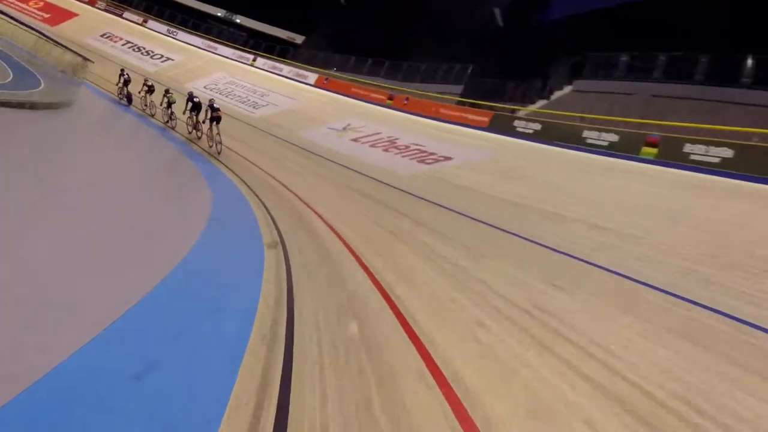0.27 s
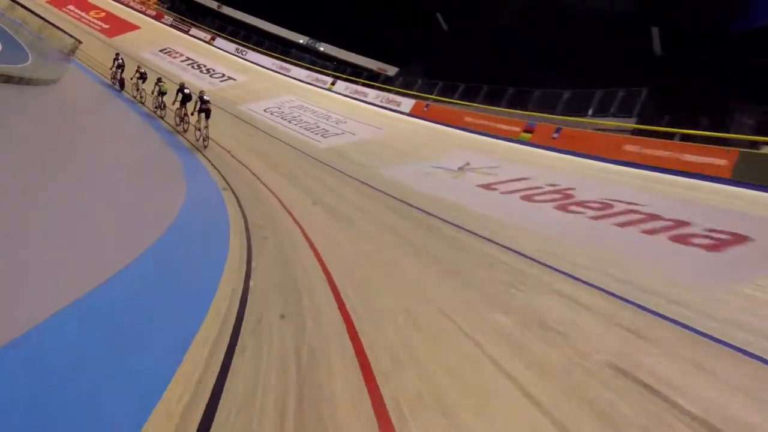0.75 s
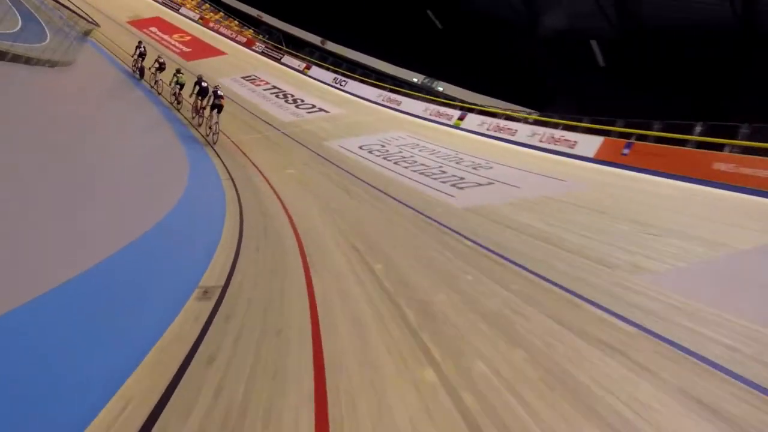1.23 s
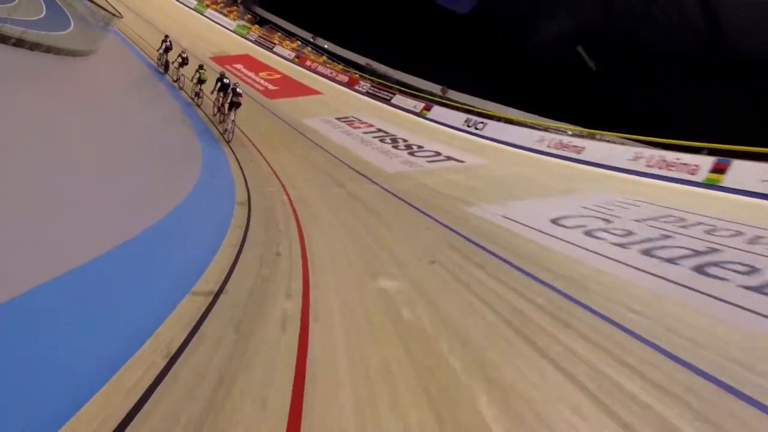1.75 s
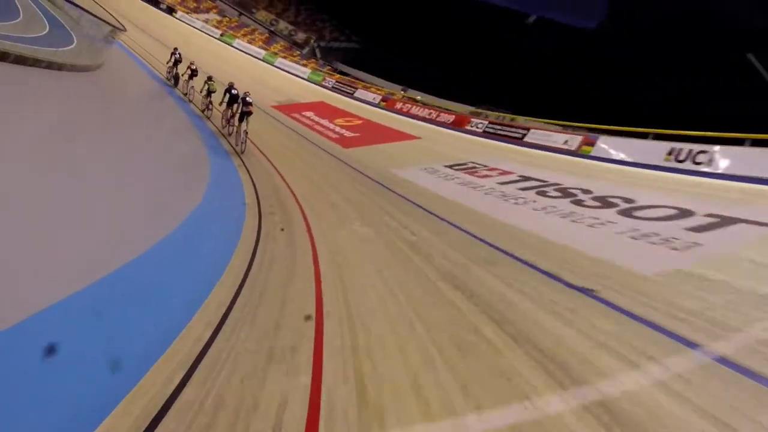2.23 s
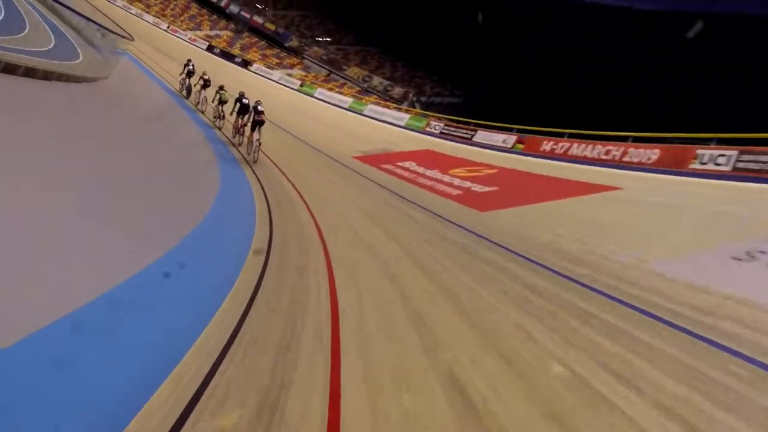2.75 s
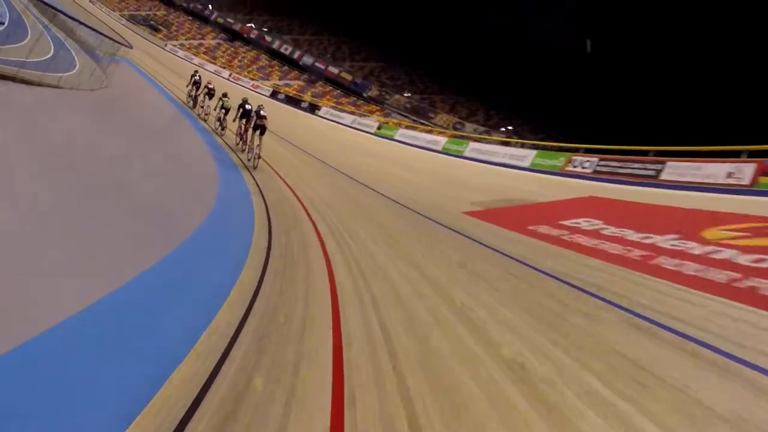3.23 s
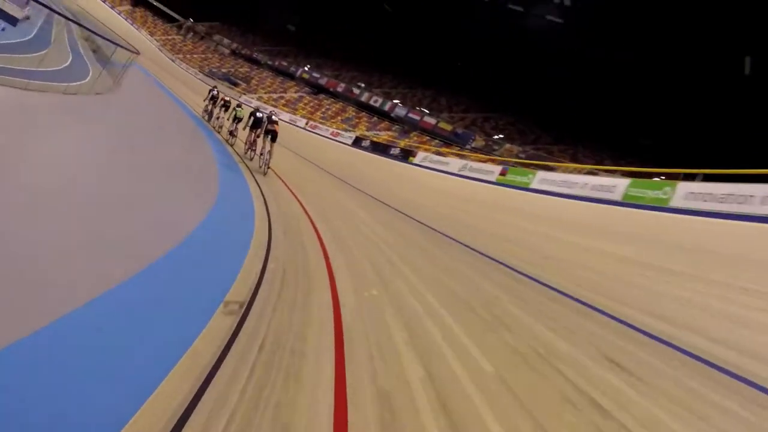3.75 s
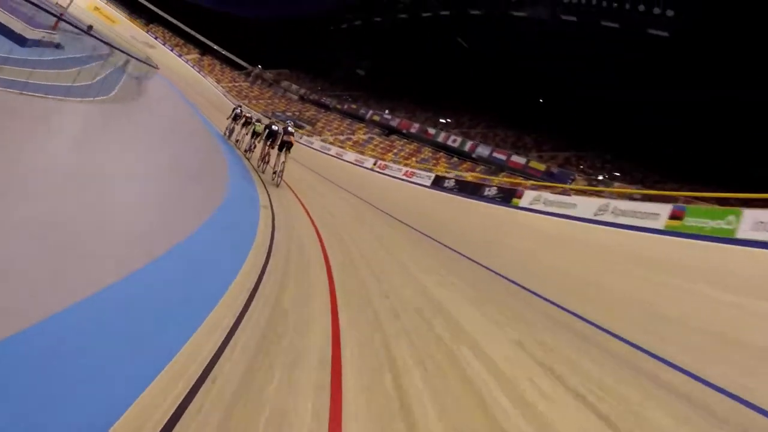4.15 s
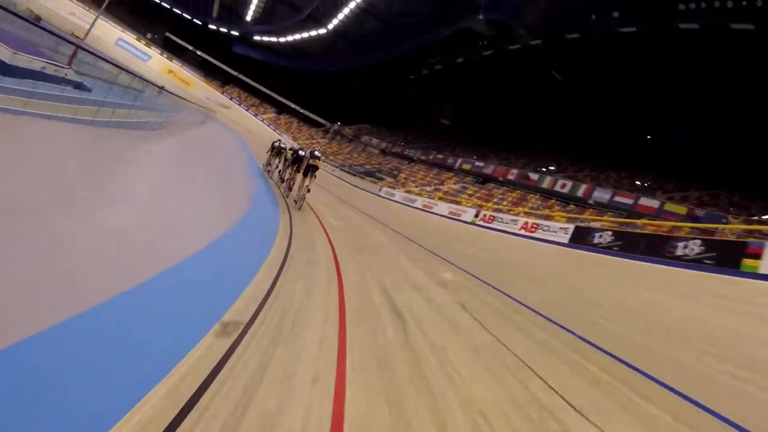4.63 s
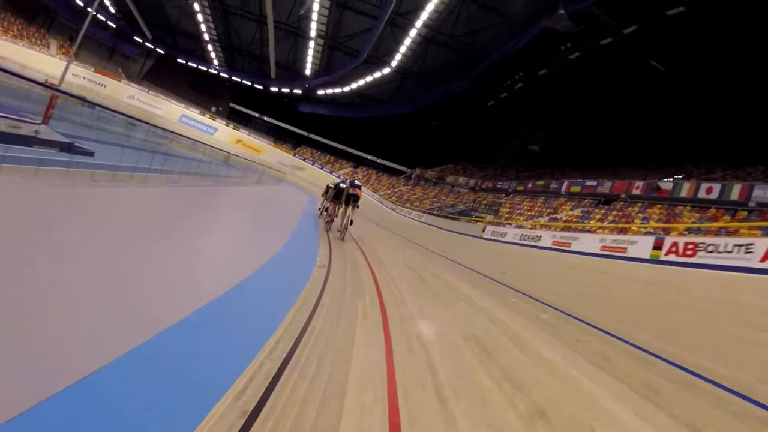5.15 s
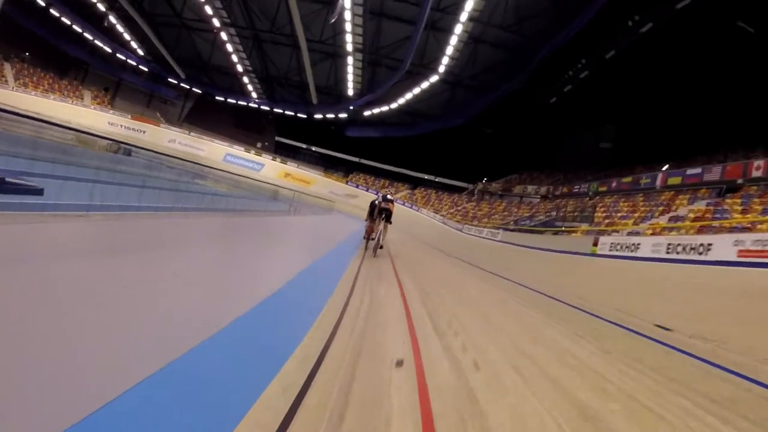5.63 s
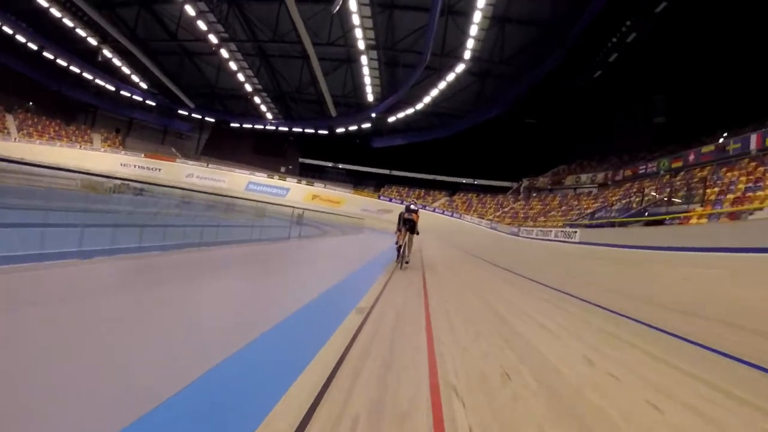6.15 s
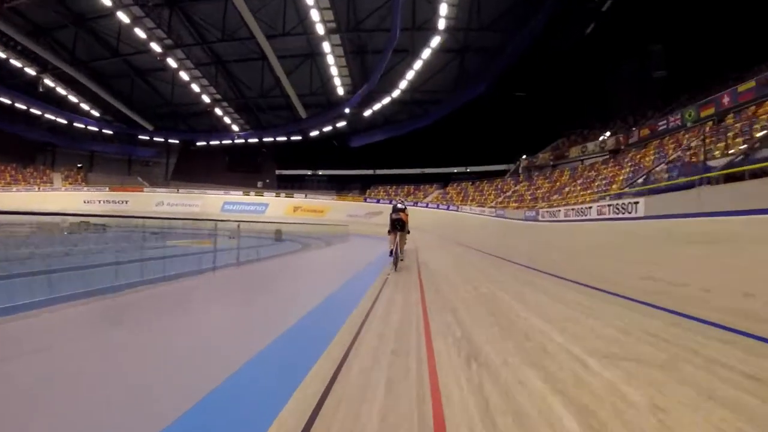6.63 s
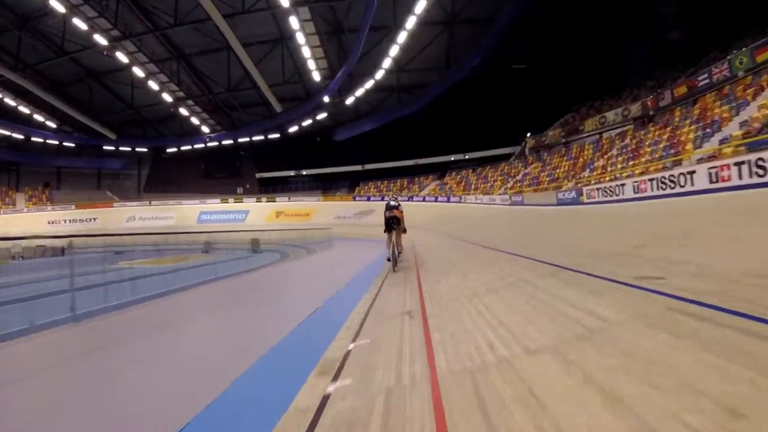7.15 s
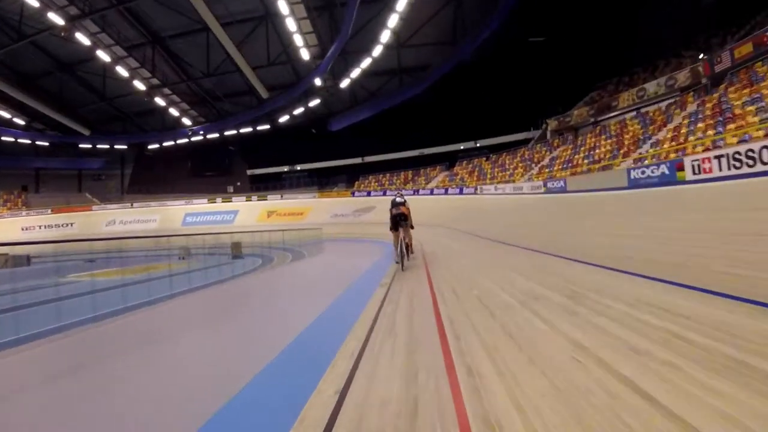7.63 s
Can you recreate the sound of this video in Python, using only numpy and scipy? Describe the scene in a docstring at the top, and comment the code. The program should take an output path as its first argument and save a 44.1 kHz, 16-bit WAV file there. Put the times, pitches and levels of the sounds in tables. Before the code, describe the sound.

From start to finish, deep wind pounds the microphone of a camera on a fast bicycle circling an indoor wooden track. The buffeting is a heavy, irregular low throb, with split-second lulls, notably near 0.4 s, frequently from 2 to 4.8 s, and at 5.7 and 7.9 s. Under it the tyres keep up a steady, grainy mid-low roar, with a hollow board drone swelling around 0.9, 3.3 and 6 s and a wavering frame hum strongest near 7.5 s. Dull, hard-edged knocks come sparsely at first, then stand out at 3.3, 4.4, a cluster at 5.1-5.2, 5.5, 6.5, 6.8 and 7.4 s. Brief ragged gusts flap, especially around 5.2-5.6 and 6.5 s. A faint, bright mount chatter, slightly pulsed by the chain, continues throughout with scattered sharp ticks. Everything is close, dense and peak-limited, with no noticeable room echo.

```python
"""Wind buffets the microphone of a camera riding on a fast track bicycle in an indoor velodrome.
Buffets are low coloured noise plus a vortex throb; flapping and rush are jolted noise.
Tyres on the wooden boards are noise through roar and resonance filters; uneven boards are dying bursts.
The camera mount chatters in random ticks, weakly pulsed by the chain, with a few sharp rattles.
A limiter in the camera holds the loudest peaks down."""
import sys
import numpy as np
from scipy import signal
from scipy.fft import rfft, irfft, next_fast_len
from scipy.io import wavfile
from scipy.ndimage import uniform_filter1d, minimum_filter1d, map_coordinates

SR = 44100
rng = np.random.default_rng(int(sys.argv[2]) if len(sys.argv) > 2 else 0)


def wrap_up_sound(samples):
    """Save the sound to the file named by the first command line argument, as 16-bit audio."""
    columns = np.atleast_2d(samples).T
    # keep every value between -1 and 1, then stretch to whole-number steps
    tamed = np.clip(columns, -1, 1)
    steps = np.round(tamed * 32767).astype(np.int16)
    wavfile.write(sys.argv[1], SR, steps)


N = 347949

# Spectrum of the big eddies. Each row: frequency in Hz, relative level in dB.
BUFFET_SPECTRUM = [(8, -12), (20, -7.5), (30, -4.5), (45, -5.5), (59, -3.5), (69, -7.5), (82, -11),
                   (93, -11), (110, -16), (180, -32), (300, -42.5), (800, -53), (4000, -110)]
# Spectrum of loose eddies under the buffets. Each row: frequency in Hz, relative level in dB.
RUMBLE_SPECTRUM = [(10, -8.5), (22, 2), (31, 3.5), (48, -7.5), (75, -2.5), (93, 0.5), (115, -3), (140, -11),
                   (180, -24), (400, -50.5), (2000, -100)]
# Strength of the headwind. Each row: time in seconds, level in dB before swings and lulls.
HEADWIND_LEVEL = [(0.1, -8.5), (1.3, -11.5), (2.8, -9), (4.2, -10), (5.7, -8.5), (6.7, -10.5), (7.8, -10)]
# Brief drops of the buffeting. Each row: centre in seconds, depth in dB (negative swells).
LULLS = [(0.36, 13), (0.525, 6), (0.885, 4), (2.05, 3), (2.25, 4.5), (2.37, 0), (2.585, 6), (2.905, 6),
         (3.08, 3), (3.245, 5), (3.45, 7.5), (3.615, 2), (3.775, 8), (3.95, 2.5), (4.13, 9), (4.31, 8),
         (4.48, 11), (4.81, 9), (5.72, 10), (5.82, 4), (6.285, 6), (6.44, 5), (6.99, 4), (7.605, -4),
         (7.87, 12)]
LULL_S = 0.027  # Gaussian half-width, to 1/e
WIND_SWING_DB, WIND_SWINGS_PER_S = 1.4, 20
WIND_CEILING_DB, RUMBLE_DB, SHEDDING_DB = -6, -22, -3  # shedding is relative to the big eddies


def wind(steadiness):
    """Big eddies, evened in strength, beat on the microphone over a loose deep rumble; small puffs flap."""
    big_eddies = unit(coloured(noise(), BUFFET_SPECTRUM))
    eddies = unit(big_eddies + amp(SHEDDING_DB) * vortices())
    power = np.abs(signal.hilbert(eddies, next_fast_len(N))[:N]) ** 2
    slow_power = filtered(power, lambda hz: np.exp(-(hz / 22) ** 2))
    strength = np.sqrt(np.abs(slow_power) + 0.039)  # the floor keeps weak eddies weak
    t = np.arange(N) / SR
    lull_db = sum(depth * np.exp(-((t - s) / LULL_S) ** 2) for s, depth in LULLS)
    level_db = curve(HEADWIND_LEVEL) + WIND_SWING_DB * wobble(WIND_SWINGS_PER_S) - lull_db
    evened = unit(eddies / strength ** steadiness)
    buffets = limited(amp(level_db) * evened, WIND_CEILING_DB)
    rumble = amp(RUMBLE_DB) * unit(coloured(noise(), RUMBLE_SPECTRUM))
    return buffets + rumble + flapping(puff_db=3.5, ragged_db=4.0)


# Shedding by the camera body, faster when the air meets it head on.
# Each row: time in seconds, vortices per second.
SHEDDING_RATE = [(0.15, 54.3), (0.5, 54), (0.85, 60), (1.3, 61.5), (1.9, 50), (2.4, 43.6), (2.6, 44.4),
                 (2.85, 41.7), (3.15, 45.3), (3.75, 38.7), (4.3, 50), (4.6, 42.7), (4.9, 51), (5.2, 47),
                 (5.65, 55), (6.2, 54.4), (7.05, 41.8), (7.65, 53)]
SHEDDING_CHANGES_PER_S = 18


def vortices():
    """A rough, narrow throb at the shedding rate, its strength and phase drifting at random."""
    phase = 2 * np.pi * np.cumsum(curve(SHEDDING_RATE)) / SR
    in_phase = wobble(SHEDDING_CHANGES_PER_S) * np.cos(phase)
    quadrature = wobble(SHEDDING_CHANGES_PER_S) * np.sin(phase)
    return unit(in_phase + quadrature)


# Spells of rougher air.
# Each row: start in seconds, length in seconds, low flapping in dB, brighter rush in dB.
GUSTS = [(0, 1.6, -28.5, -35.5), (0.384, 0.045, -23.5, -35), (0.702, 0.05, -26, -38),
         (2, 0.058, -22.5, -28), (2.463, 0.048, -24.5, -30), (3.34, 0.039, -25, -25.5),
         (4.05, 0.046, -33, -29), (4.664, 0.09, -35, -31.5), (5.151, 0.061, -20, -26),
         (5.498, 0.03, -17, -26), (5.559, 0.049, -20.5, -26), (6.032, 0.033, -25.5, -27),
         (6.261, 0.054, -27, -31), (6.501, 0.063, -17, -35.5), (7.157, 0.23, -27, -39),
         (7.436, 0.036, -19.5, -32), (7.533, 0.027, -25.5, -31), (7.74, 0.023, -33, -22)]
# Spectrum of the flapping puffs. Each row: frequency in Hz, relative level in dB.
PUFF_SPECTRUM = [(80, -18), (130, -1), (190, -3), (280, -3.5), (380, -13), (1000, -35), (4000, -79)]
# Spectrum of a gust's rush. Each row: frequency in Hz, relative level in dB.
RUSH_SPECTRUM = [(150, -9.5), (400, 1.5), (850, 0), (1200, -10.5), (1800, -20), (2800, -32.5),
                 (5000, -43.5), (10000, -71)]
GUST_ATTACK_S, GUST_RELEASE_S = 0.03, 0.013
FLAP_DB, FLAP_DB_PER_SHAKE_DB = -32, 0.49  # flapping in smooth air


def flapping(puff_db, ragged_db):
    """Low puffs of air never cease; each gust strengthens them and adds a ragged rush."""
    t = np.arange(N) / SR
    low, bright = np.zeros(N), np.zeros(N)
    for s, length, low_db, rush_db in GUSTS:
        attack = np.clip((t - s) / GUST_ATTACK_S, 0, 1)
        release = np.exp(-np.maximum(t - s - length, 0) / GUST_RELEASE_S)
        low += amp(low_db) * attack * release
        bright += amp(rush_db) * attack * release
    smooth_air = amp(FLAP_DB + FLAP_DB_PER_SHAKE_DB * shaking())
    strength = np.hypot(smooth_air, low)
    puff_jolts = jolts(per_s=120, decay_s=0.0072)
    puffs = unit(coloured(noise() * amp(puff_db * puff_jolts), PUFF_SPECTRUM))
    rush_jolts = jolts(per_s=110, decay_s=0.0026)
    rush = unit(coloured(noise() * amp(ragged_db * rush_jolts), RUSH_SPECTRUM))
    return strength * puffs + bright * rush


# How hard the track shakes the bicycle. Each row: time in seconds, relative tyre level in dB.
TRACK_LEVEL = [(0.05, -27), (1.6, -26.5), (1.82, -27.5), (2.0, -26), (3.15, -27.5), (3.38, -27),
               (3.92, -31), (4.18, -26), (4.55, -27.5), (4.75, -26), (4.95, -30), (5.18, -27.5),
               (5.38, -28), (5.55, -25), (5.68, -29.5), (6.15, -26.5), (6.8, -26.5), (7.2, -26.5),
               (7.6, -27)]
# Spectrum of the tyre roar. Each row: frequency in Hz, relative level in dB.
ROAR_SPECTRUM = [(60, -15), (110, -1), (190, -3.5), (310, -0.5), (450, 0), (560, -4.5), (730, -9.5),
                 (1000, -11.5), (1250, -20.5), (1800, -27), (2500, -36), (4000, -51.5), (9000, -75)]
# Frame resonances. Each row: frequency in Hz, width in Hz, relative gain in dB.
FRAME_MODES = [(548.4, 30, -4), (639.6, 23, -4.5), (826, 46, -12), (1946, 42, -26.5), (2115, 26, -25)]
# The frame's two lowest resonances. Each row: frequency in Hz, width in Hz, relative gain in dB.
FRAME_HUM_MODES = [(367, 20, 0.5), (456, 32, -7.5)]
# Frame hum as the rider loads it. Each row: time in seconds, level in dB.
HUM_LEVEL = [(0.1, -26.5), (0.6, -36.5), (1.3, -29), (1.75, -31), (2.5, -31), (3.0, -32.5), (3.45, -31.5),
             (3.9, -31), (4.4, -30), (4.85, -32), (5.28, -27.5), (5.8, -33.5), (6.5, -28.5), (7.1, -35),
             (7.53, -24), (7.85, -31)]
# Resonance of the hollow boards. Each row: frequency in Hz, width in Hz, relative gain in dB.
BOARD_MODES = [(144.3, 17, 0)]
# Drone of the hollow boards. Each row: time in seconds, relative level in dB.
DRONE_LEVEL = [(0.05, -22.5), (0.85, -17.5), (1.1, -25.5), (1.7, -24.5), (2.48, -21), (2.8, -28),
               (3.2, -28), (3.34, -18.5), (3.5, -27.5), (4.05, -29.5), (4.65, -22.5), (5.1, -24),
               (5.7, -29.5), (6.0, -18.5), (6.28, -25), (6.6, -22.0), (7.3, -20.5), (7.85, -29.5)]
CHURN_DB = 1.3  # depth of the roar's swelling patches
HUM_WANDER, DRONE_WANDER = 0.01998, 0.01797  # pitch drift as a share


def tyres(jolt, roar_db, rough_db, frame_db, drone_db):
    """Track grain drives a broad roar and the frame; steady noise rings the hum and hollow boards."""
    tread = patchy(noise() * amp(rough_db * jolt), depth_db=1.66, size=3)
    roar = unit(coloured(patchy(tread, CHURN_DB, size=4, order=1024), ROAR_SPECTRUM))

    frame = ringing(noise() * amp(rough_db * jolt), FRAME_MODES)
    frame = unit(coloured(frame, [(150, -23.0), (350, 7.5), (2200, 4.5), (2600, -29.5), (9000, -59.5)]))

    drone_drive = coloured(noise(), [(60, -22.0), (145, -3.5), (220, -12.5), (1000, -56.5)])
    drone = unit(ringing(drone_drive, BOARD_MODES))
    drone = amp(curve(DRONE_LEVEL) + drone_db) * wandering(drone, DRONE_WANDER, rate=4)

    hum_drive = coloured(noise(), [(150, -25.5), (350, 0), (500, -0.5), (1500, -24), (9000, -68.5)])
    hum = unit(ringing(hum_drive, FRAME_HUM_MODES))
    hum = amp(curve(HUM_LEVEL)) * wandering(hum, HUM_WANDER, rate=5)

    rolling = unit(roar + amp(frame_db) * frame)
    return amp(curve(TRACK_LEVEL) + roar_db) * rolling + hum + drone


def shaking():
    """Track shaking in dB about its mean, from the tyre level."""
    level_db = curve(TRACK_LEVEL)
    return level_db - level_db.mean()


# Uneven boards under the wheels.
# Each row: start in seconds, thump peak in dB, hard edge peak in dB, crack peak in dB.
BUMPS = [(0.313, -21, -22.5, -35), (0.892, -14, -18.5, -36.5), (1.556, -11.5, -25, -35),
         (2.031, -14, -21, -40), (2.091, -22, -26, -32.5), (2.367, -13.5, -22, -39), (2.490, -13, -21, -39),
         (2.4991, -12, -18, -26), (2.675, -16.5, -18, -37), (3.105, -30, -18, -33),
         (3.3201, -10, -12.5, -29), (3.329, -17, -18, -38), (3.558, -22, -24, -31),
         (3.615, -15, -30.5, -40), (3.732, -16, -18, -32), (4.352, -22, -25, -35), (4.366, -10, -13, -25.5),
         (4.600, -23, -20, -34.5), (4.802, -22, -18, -39), (4.820, -18, -23, -42),
         (5.124, -12.5, -22.5, -38.5), (5.1407, -30, -18.5, -32.5), (5.164, -14.5, -17.5, -35),
         (5.173, -16, -19.5, -27), (5.184, -19, -18, -37), (5.508, -12, -13.5, -34), (5.524, -8, -13, -34),
         (5.604, -16, -24, -32), (5.791, -21, -17, -40), (5.819, -20, -28, -42), (6.356, -14, -21.5, -40),
         (6.364, -21, -21, -40), (6.521, -8.5, -19, -35), (6.799, -9, -19.5, -33), (6.996, -12, -23, -39),
         (7.264, -23, -24, -38), (7.411, -9, -20, -38), (7.523, -18, -25, -31), (7.594, -12.5, -20, -33),
         (7.726, -15.5, -17, -41), (7.744, -17, -19.5, -31)]
# Spectrum of a thump. Each row: frequency in Hz, relative level in dB.
THUMP_SPECTRUM = [(60, -5), (140, 12.5), (250, 15.5), (500, 6), (900, -10), (1400, -24.5), (3000, -60),
                  (8000, -73.5)]
# Spectrum of a hard edge. Each row: frequency in Hz, relative level in dB.
EDGE_SPECTRUM = [(250, -8), (500, 17.5), (900, 17), (1400, -1.5), (2200, -14), (3200, -25), (5000, -32),
                 (9000, -55.5)]
# Spectrum of a crack. Each row: frequency in Hz, relative level in dB.
CRACK_SPECTRUM = [(600, -14), (1100, 0), (1600, -1), (2500, -8), (3800, -15), (4600, -32), (9000, -60)]


def bumps():
    """An uneven board gives a dull thump, a short hard edge and a crack, each with its own level."""
    s, body, edge, crack = np.transpose(BUMPS)
    thumps = bursts(zip(s, body), t60=0.066, spectrum=THUMP_SPECTRUM, attack_s=0.0016)
    edges = bursts(zip(s, edge), t60=0.026, spectrum=EDGE_SPECTRUM, attack_s=0.0007)
    cracks = bursts(zip(s, crack), t60=0.014, spectrum=CRACK_SPECTRUM, attack_s=0.0004)
    return thumps + edges + cracks


# Mount chatter. Each row: time in seconds, relative level in dB.
CHATTER_LEVEL = [(0.05, -53), (0.57, -53), (0.7, -54), (1.37, -52.5), (1.5, -54.5), (2.0, -53), (2.2, -53),
                 (2.4, -53), (3.1, -53), (3.6, -55), (3.8, -57.5), (4.3, -54), (4.65, -54), (4.85, -56),
                 (5.35, -53.5), (5.8, -54.5), (6.6, -53.5), (7.1, -53.5), (7.85, -54.5)]
# Spectrum of the contacts. Each row: frequency in Hz, relative level in dB.
CHATTER_SPECTRUM = [(800, -16), (1800, -0.5), (2900, 2.5), (4200, -2), (5000, 0), (6300, -3.5),
                    (7000, -7.5), (9200, -9.5), (10200, -18), (11000, -19.5), (11400, -30), (15000, -46.5)]
# Mount and housing resonances. Each row: frequency in Hz, width in Hz, relative gain in dB.
MOUNT_MODES = [(3000, 60, -7), (3280, 45, 1.5), (3610, 60, 0), (3725, 60, 4), (4218, 50, -3),
               (4950, 90, -4), (5130, 150, -9), (5630, 65, -2), (6170, 50, -7), (6420, 60, -7),
               (7394, 24, 5.5), (8897, 45, 1)]


def mount(jolt, chatter_db, swing_db, shake_db, flutter_db, chain_db, ticks_per_s, hiss_db, ring_db,
          rattle_db):
    """Clusters of tiny contacts, pulsing with the chain, and a few hard ones ring mount and housing."""
    ticks = (rng.random(N) < ticks_per_s / SR) * noise()
    flutter = jolts(per_s=38, decay_s=0.0056)
    clusters = amp(shake_db * jolt + flutter_db * flutter + chain_db * chain())
    ticks_and_hiss = unit(ticks) + amp(hiss_db) * noise()
    contacts = unit(coloured(ticks_and_hiss * clusters, CHATTER_SPECTRUM))
    level_db = curve(CHATTER_LEVEL) + chatter_db + swing_db * wobble(21)
    # the contact point wanders, so the colour keeps changing
    chatter = patchy(amp(level_db) * contacts, depth_db=1.68, size=14)
    struck = chatter + amp(rattle_db) * rattles()
    return struck + amp(ring_db) * ringing(struck, MOUNT_MODES)


# Links meshing with the chainring. Each row: time in seconds, links per second.
CHAIN_RATE = [(0.2, 98.2), (2.2, 94.5), (4.3, 93.5), (5.5, 100), (7.85, 90)]


def chain():
    """The tug of the links on the chainring, one cycle a link, slightly unsteady."""
    return np.cos(2 * np.pi * np.cumsum(curve(CHAIN_RATE)) / SR + 0.9 * wobble(4))


# Sharp rattles of the mount. Each row: start in seconds, relative peak in dB, pitch in Hz.
RATTLES = [(0.183, -38, 4950), (0.2417, -38, 3740), (0.511, -32, 2740), (0.594, -35.5, 3760),
           (1.021, -31.5, 2960), (1.159, -40, 4950), (1.213, -34, 2900), (1.352, -42, 2900),
           (2.1241, -37, 2880), (2.2518, -39, 5000), (2.867, -37, 3333), (3.716, -40, 4870),
           (4.258, -37, 3644), (4.289, -38.5, 5030), (4.591, -35, 4947), (5.3623, -36.5, 3720),
           (6.3016, -32, 2850), (6.618, -30.5, 2870), (7.717, -37, 2900), (7.8153, -34, 3620)]
# Colour of a rattle. Each row: multiple of its pitch, relative level in dB.
RATTLE_COLOUR = [(.4, -18), (.8, -0.5), (1.001, 1), (1.2, -14), (1.7, -5), (2.2, -30), (3.2, -54.5)]


def rattles():
    """Hard contacts as short noise bursts, each coloured around the pitch of the part that is hit."""
    multiple, db = np.transpose(RATTLE_COLOUR)
    out = np.zeros(N)
    for s, peak_db, hz in RATTLES:
        spectrum = np.column_stack([hz * multiple, db])
        out += bursts([(s, peak_db)], t60=0.052, spectrum=spectrum, attack_s=0.00041)
    return out


def jolts(per_s, decay_s):
    """Random jolts of bounded strength, each sudden and then dying away; rms 1."""
    kicks = (rng.random(N) < per_s / SR) * rng.random(N)
    shakes = signal.lfilter([1], [1, -np.exp(-1 / (decay_s * SR))], kicks)
    smooth = uniform_filter1d(shakes - shakes.mean(), size=40)
    return unit(np.tanh(unit(smooth) / 2))


def bursts(events, t60, spectrum, attack_s):
    """A short dying burst of coloured noise for each (s, peak dB) row; t60 in seconds."""
    out, t = np.zeros(N + SR), np.arange(SR // 5) / SR
    envelope = amp(-60 * t / t60) * (1 - np.exp(-t / attack_s)) ** 2
    for s, db in events:
        burst = coloured(rng.standard_normal(len(t)), spectrum) * envelope
        out[round(s * SR):][:len(t)] += amp(db) * burst / np.abs(burst).max()
    return out[:N]


def ringing(x, modes):
    """x through a parallel bank of damped resonances."""
    return sum(amp(db) * signal.lfilter(*signal.iirpeak(hz, hz / width, SR), x)
               for hz, width, db in modes)


def patchy(x, depth_db, size, order=256):
    """Let patches of x, about size bins wide and three frames long, swell and fade at random."""
    z = signal.stft(x, nperseg=order)[2]
    field = uniform_filter1d(rng.standard_normal(z.shape), size, axis=0)
    field = uniform_filter1d(field, size=3, axis=1)
    return signal.istft(z * amp(depth_db * unit(field)), nperseg=order)[1][:N]


def wandering(x, share, rate):
    """Drift the pitch of x by varying its playing speed, rate random knots a second."""
    speed = 1 + share * wobble(rate)
    return map_coordinates(x, [np.cumsum(speed / speed.mean()) - 1], mode="nearest")


def limited(x, ceiling_db):
    """Turn the gain down smoothly around every peak that would pass the ceiling."""
    span = SR // 100
    needed = np.minimum(1, amp(ceiling_db) / (np.abs(x) + 1e-9))
    held = minimum_filter1d(needed, 2 * span)
    return x * uniform_filter1d(uniform_filter1d(held, span), span)


def filtered(x, response):
    """x times a response of frequency in Hz."""
    m = next_fast_len(len(x) + SR // 4)
    return irfft(rfft(x, m) * response(np.fft.rfftfreq(m, 1 / SR)), m)[:len(x)]


def coloured(x, spectrum):
    """x through (Hz, dB) points joined on a log axis."""
    hz, db = np.transpose(spectrum)
    return filtered(x, lambda f: amp(np.interp(np.log(f + 1), np.log(hz), db)))


def noise():
    """Fresh white noise."""
    return rng.standard_normal(N)


def wobble(rate):
    """A smooth random curve, rate knots a second."""
    knots = rng.standard_normal(int(N * rate / SR) + 4)
    return map_coordinates(knots, [np.arange(N) * rate / SR])


def curve(rows):
    """(s, value) rows as one value per sample."""
    return np.interp(np.arange(N) / SR, *np.transpose(rows))


def amp(db):
    """Decibels to gain."""
    return 10 ** (np.asarray(db) / 20)


def unit(x):
    """Scale to rms 1."""
    return x / np.sqrt(np.mean(x ** 2) + 1e-20)


def scene():
    """Wind, tyres, bumps and mount; the same jolts of the track shake bicycle and camera."""
    jolt = jolts(per_s=55, decay_s=0.0067)
    air = wind(steadiness=0.75)
    rolling = tyres(jolt, roar_db=2.5, rough_db=1.47, frame_db=-9.5, drone_db=0.44)
    rattle = mount(jolt, chatter_db=-1.83, swing_db=0.85, shake_db=0.5, flutter_db=1.5, chain_db=0.5,
                   ticks_per_s=860, hiss_db=8.0, ring_db=1.0, rattle_db=-5.0)
    return (air + rolling + bumps() + rattle)[None]


TOP_HZ = 15700


def record(dry):
    """The camera's limiter, then a low-pass at TOP_HZ."""
    held = limited(dry[0], ceiling_db=-1.4)
    return filtered(held, lambda hz: hz < TOP_HZ)[None]


dry = scene()
out = record(dry)
wrap_up_sound(out)
```